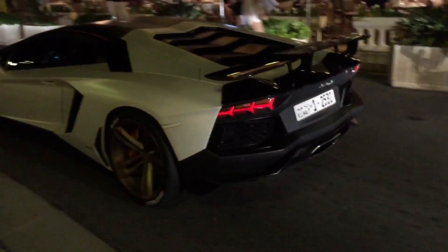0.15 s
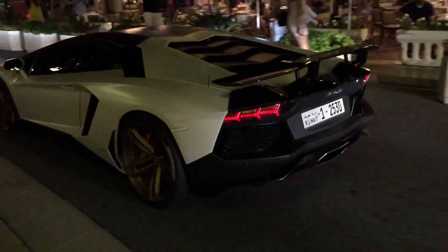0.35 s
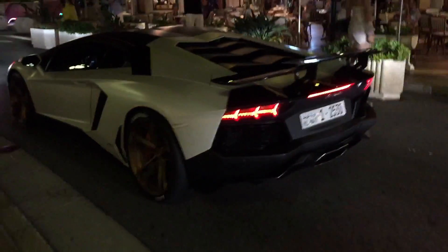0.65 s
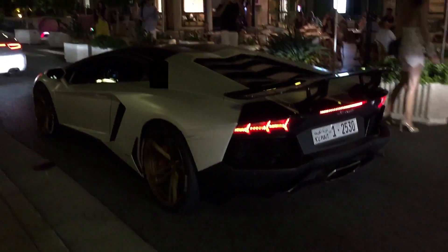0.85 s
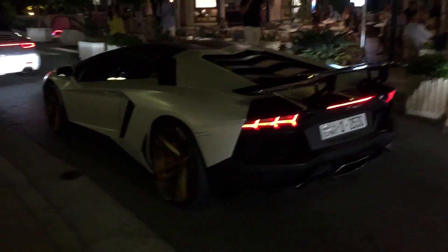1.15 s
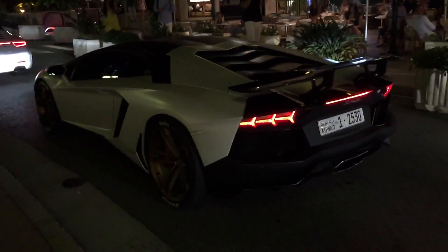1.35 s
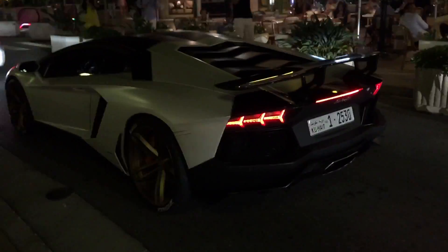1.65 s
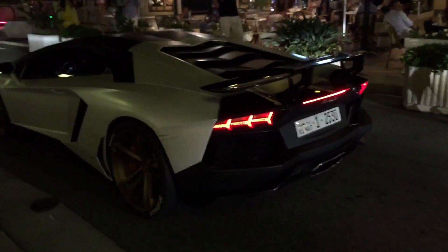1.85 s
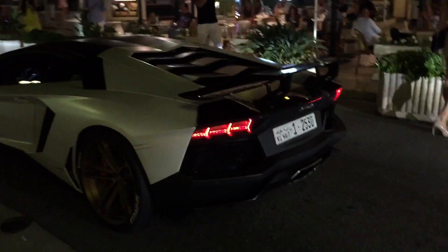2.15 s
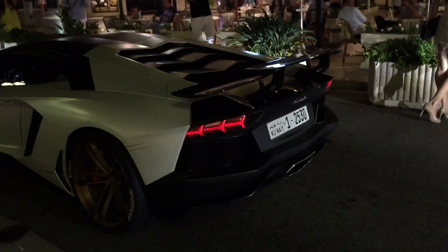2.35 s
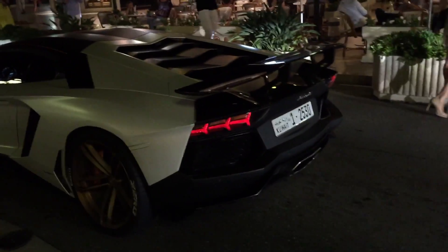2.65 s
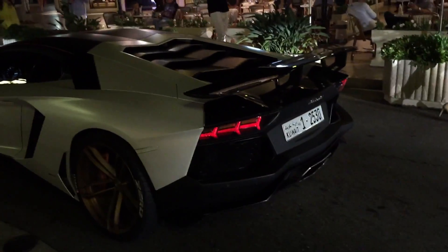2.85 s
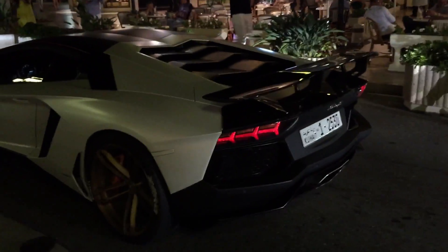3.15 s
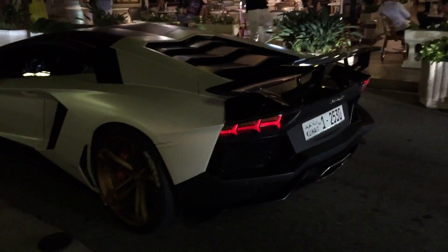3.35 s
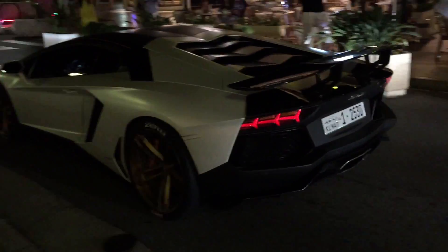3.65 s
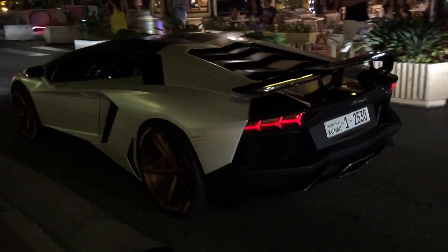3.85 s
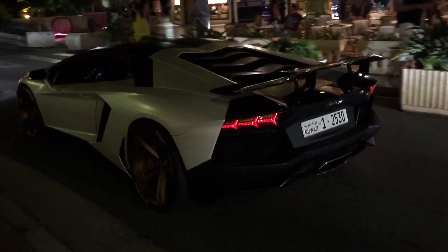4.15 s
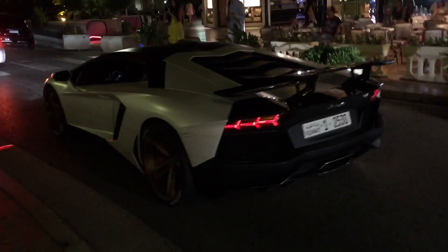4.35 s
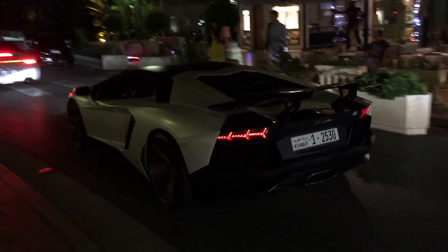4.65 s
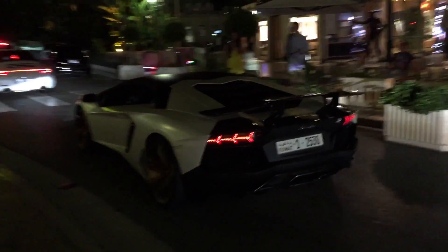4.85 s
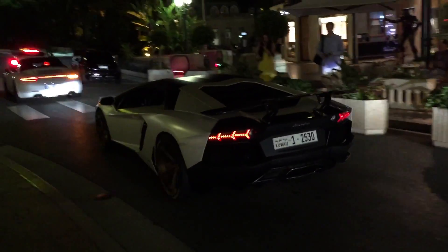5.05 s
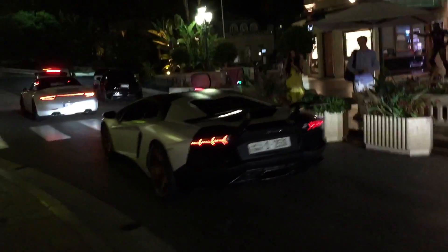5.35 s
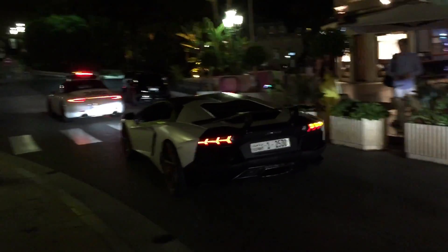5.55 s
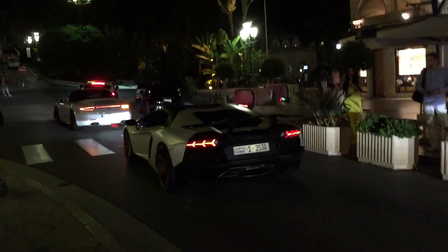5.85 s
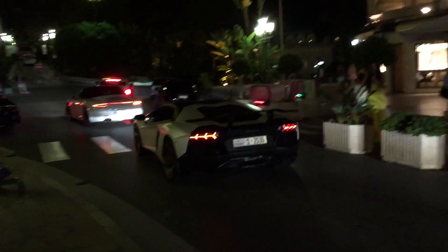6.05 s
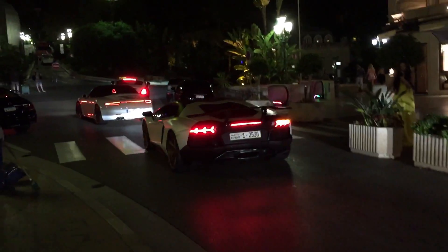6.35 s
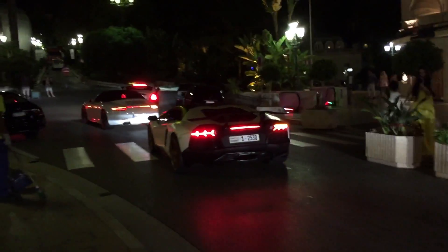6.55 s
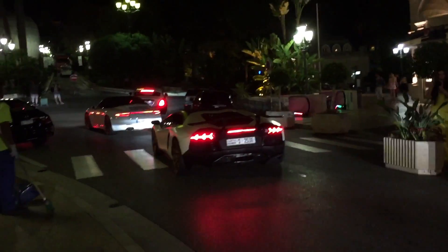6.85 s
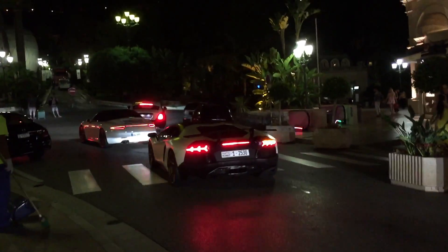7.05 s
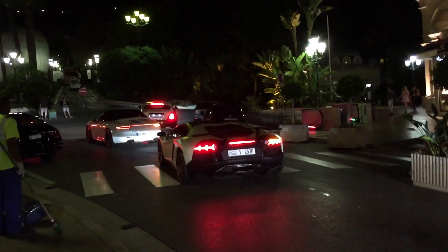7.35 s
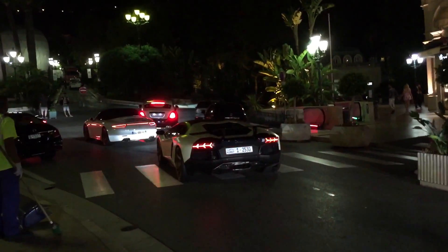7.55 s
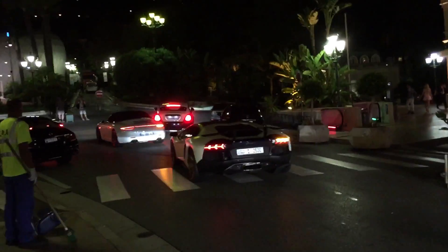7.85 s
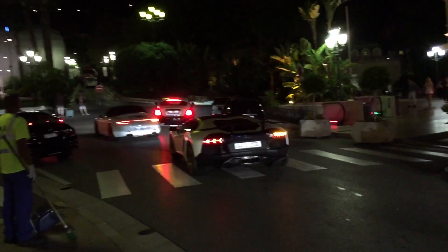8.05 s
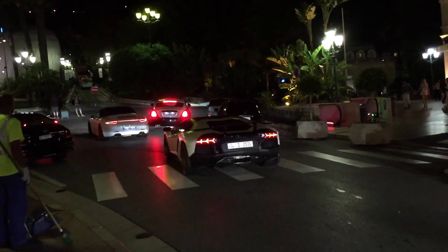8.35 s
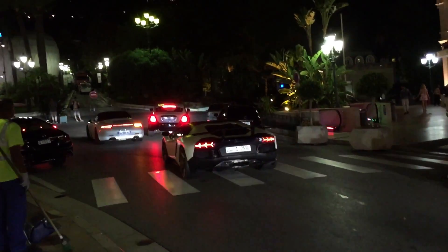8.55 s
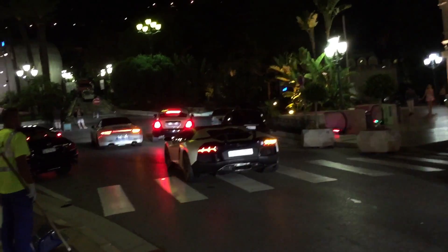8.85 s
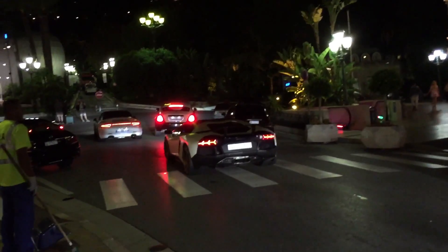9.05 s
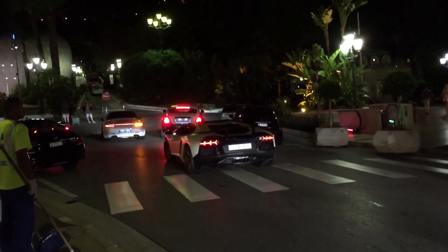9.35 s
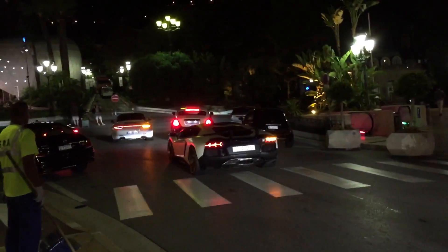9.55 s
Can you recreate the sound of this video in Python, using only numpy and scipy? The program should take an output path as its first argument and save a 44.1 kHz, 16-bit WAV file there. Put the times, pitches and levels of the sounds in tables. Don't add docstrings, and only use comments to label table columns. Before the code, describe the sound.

Lumpy low exhaust drone of a powerful car creeping past, revving up to a smooth hum, crackling off throttle, idling, then surging once more.

```python
import sys
import numpy as np
from scipy import signal
from scipy.fft import rfft, irfft
from scipy.io import wavfile
from scipy.ndimage import uniform_filter1d

SR = 44100
rng = np.random.default_rng(int(sys.argv[2]) if len(sys.argv) > 2 else 0)


def gain_from_decibels(decibels):
    exponent = np.asarray(decibels, float) / 20
    return 10 ** exponent


def generate_wav(signal):
    frames = np.transpose(np.atleast_2d(signal))
    scaled = np.clip(frames, -1, 1) * 32767
    pcm = np.round(scaled).astype(np.int16)
    wavfile.write(sys.argv[1], SR, pcm)


N = 428211


def rms_one(x):
    return x / np.sqrt(np.mean(x ** 2) + 1e-20)


def in_time(rows):
    s, *columns = np.transpose(rows)
    return [np.interp(np.arange(N) / SR, s, c) for c in columns]


def swells(rows):
    t = np.arange(0, N + 64, 64) / SR
    s, half, height = np.transpose(rows)[:, :, None]
    bumps = height * (1 + np.cos(np.pi * np.clip((t - s) / half, -1, 1))) / 2
    return np.interp(np.arange(N) / SR, t, bumps.sum(axis=0))


def drift(rate_hz, count, size):
    knots = rng.standard_normal((count, int(N / SR * rate_hz) + 4))
    at = np.arange(size) / size * N / SR * rate_hz
    return [np.interp(at, np.arange(len(k)), k) * 1.65 for k in knots]


def on_log_pitch(points, hz):
    curve_hz, curve_db = np.array(points).T
    return np.interp(np.log(hz), np.log(curve_hz), curve_db)


def coloured(x, points):
    hz = np.fft.rfftfreq(N, 1 / SR) + 1
    return rms_one(irfft(rfft(x) * gain_from_decibels(on_log_pitch(points, hz)), N))


def resonate(x, modes):
    out = 0
    for k, (hz, width_hz, level_db) in enumerate(modes):
        r = np.exp(-np.pi * width_hz / SR)
        numerator = [(1 - r * r) / 2, 0, (r * r - 1) / 2]
        denominator = [1, -2 * r * np.cos(2 * np.pi * hz / SR), r * r]
        out = out + (-1) ** k * gain_from_decibels(level_db) * signal.lfilter(numerator, denominator, x)
    return out


def gliding_band(envelope, centre_hz, width_hz):
    slow = signal.lfilter(*signal.butter(2, width_hz / SR), rng.standard_normal((2, N)) * envelope)
    turn = 2 * np.pi * np.cumsum(centre_hz) / SR
    return rms_one(slow[0] * np.cos(turn) + slow[1] * np.sin(turn))


# time_s, firings_per_s
SPEED = [(0, 112), (.15, 89), (1.8, 91.5), (2.88, 88.5), (3.03, 100), (3.17, 142), (3.37, 157.6),
         (3.67, 163.2), (4.45, 153), (5.1, 166), (5.42, 146.5), (6.1, 143), (6.5, 126), (6.93, 91),
         (8.53, 93.5), (8.84, 155), (9.36, 184), (9.71, 166)]
# centre_s, half_length_s, lost_firings_per_s
SAGS = [(.28, .2, 15), (.81, .25, 7.5), (1.15, .3, 3.5), (1.98, .12, 2.8), (4.02, .22, 11.5),
        (5.7, .15, -2), (5.9, .15, 9), (6.31, .13, 7), (6.67, .12, 5), (7.06, .2, 10.5), (7.53, .2, 2.6),
        (7.99, .15, 2.6), (8.28, .07, 3), (8.4, .1, 1.6), (9.19, .12, -3), (9.47, .08, 2),
        (9.62, .08, -3.5)]


def engine_speed():
    return in_time(SPEED)[0] - swells(SAGS)


LOADED_SPEED = (91, 180)


def load(speed):
    return np.interp(speed, LOADED_SPEED, [0, 1])


def per_firing(firings):
    return rng.standard_normal(int(firings[-1]) + 1)[firings.astype(int)]


# time_s, level_db
PULSES = [(0, -16), (.6, -13), (1.06, -14.5), (3.05, -14), (3.25, -8), (3.5, -13), (3.85, -13),
          (5.1, -13.5), (5.45, -24), (5.65, -22), (6.0, -21), (6.8, -12.5), (6.96, -11), (8.55, -14.5),
          (8.87, -7.5), (9.1, -12), (9.62, -15.5), (9.71, -24.5)]
# pitch_hz, gain_db
PIPE_GAIN = [(74, -13.5), (82, -12.5), (90, -10), (110, -3.5), (128, -1.5), (145, 1.5), (160, 1.5),
             (184, 2.5)]
# pitch_hz, gain_db
OCTAVE_GAIN = [(148, -2), (182, -1), (205, -7.5), (240, -19.5), (282, -7.5), (312, -32), (345, -21),
               (370, -37.5)]
# centre_s, half_length_s, tone_loss_db, octave_loss_db
STUMBLES = [(.14, 0.11, -2, -2.5), (0.423, 0.07, 2, 3), (0.708, 0.072, 4.5, 2.5), (.98, 0.09, 0.5, 2),
            (1.94, 0.053, 3, 1.5), (2.764, 0.044, 5, 4.5), (2.864, .05, -1, 0.5), (3.083, 0.04, 0, 19),
            (4.013, .2, 6.5, 7), (4.46, 0.19, 1.5, 4), (5.49, .25, 4.5, 4), (5.897, .06, 1, -5.5),
            (6.192, 0.047, 5, 3), (6.854, .06, 3, 7), (7.14, 0.16, 8, 3), (7.328, 0.056, 4, 3),
            (7.6, 0.079, -.5, 5), (7.768, 0.03, 10, 3.5), (7.92, 0.06, 0.5, 4.5), (8.057, 0.027, 0, 8),
            (8.1, 0.035, 6, -.5), (8.15, .04, -1.5, 2), (8.234, 0.021, 1.5, 3), (8.34, 0.036, 0.5, 3),
            (8.463, 0.039, 4, 2), (8.647, 0.12, 2, 19), (8.773, 0.066, 8, 5.5), (8.973, .07, 3, -2),
            (9.198, .06, 2, 12), (9.432, 0.087, 3.5, 6)]


def note_levels(speed):
    gaps = [(s - 0.008, 0.034, 4) for s, _ in POPS]
    pulse_db = in_time(PULSES)[0] - swells(gaps)
    tone_db = pulse_db + on_log_pitch(PIPE_GAIN, speed) - swells(np.array(STUMBLES)[:, :3])
    octave_db = pulse_db + on_log_pitch(OCTAVE_GAIN, 2 * speed) - swells(np.delete(STUMBLES, 2, axis=1))
    harsh_db = in_time(IMBALANCE)[2]
    return tone_db, octave_db + 0.79 * load(speed) * (harsh_db - harsh_db.mean())


def firing_tones(firings, tone_db, octave_db):
    turn = 2 * np.pi * firings
    return np.sqrt(2) * (gain_from_decibels(tone_db) * np.sin(turn) + gain_from_decibels(octave_db) * np.sin(2 * turn + 0.63))


# time_s, lumpiness_db, bank_lopsidedness_db, harshness_db
IMBALANCE = [(0, -25.5, -40, -29), (.45, -30.5, -31.5, -44), (.98, -26.5, -25.5, -44),
             (1.6, -24, -31.5, -47), (2.9, -28.5, -31, -47.5), (3.14, -23.5, -19.5, -37),
             (3.5, -33, -28, -38), (4.45, -32.5, -29, -42), (5.2, -34.5, -43, -36), (5.9, -27, -35, -36),
             (6.81, -25.5, -35, -36.5), (7.15, -32, -31.5, -43), (8.5, -26.5, -38, -25.5),
             (8.66, -22.5, -23, -20), (8.77, -28.5, -22, -29.5), (9.05, -28, -24, -28.5),
             (9.22, -39, -44, -34), (9.71, -36.5, -36.5, -45.5)]


def imbalance_levels(speed):
    lumpy_db, lopsided_db, harsh_db = in_time(IMBALANCE)
    lost_db = load(speed) * swells(np.array(STUMBLES)[:, :3])
    scatter_db = -34 + 0.95 * (lumpy_db - lumpy_db.mean())
    return lumpy_db, lopsided_db - 2 * lost_db, harsh_db, scatter_db


# order_quarters, level_db
QUARTERS = [(2, -0.5), (3, 3.5), (5, -1), (6, 0), (7, 2.5), (9, -5.5), (10, -5.5), (11, -6), (12, 0.5),
            (13, -13), (14, -16), (15, -14), (16, -8.5), (18, -25), (20, -16.5), (24, -6.5)]
# pitch_hz, width_hz, level_db
PIPE = [
    [(58.3, 29, -13.5), (114, 60.6, -3.5), (184.2, 28.9, 4)],
    [(278.9, 34.5, 0)],
    [(356.3, 45.6, -2), (453, 24, -12.5), (587.5, 77, 0)],
]


def imbalance(firings, low_db, middle_db, upper_db, scatter_db):
    coarse = firings[::8]
    wander = drift(5.5, count=len(QUARTERS), size=len(coarse))
    start = rng.random(len(QUARTERS))
    lines = 0
    for (quarters, level_db), w, phase in zip(QUARTERS, wander, start):
        lines = lines + gain_from_decibels(level_db + 1.18 * w) * np.sin(2 * np.pi * (coarse * round(quarters) / 4 + phase))
    lines = signal.resample_poly(lines, 8, 1)[:N]
    kicks = np.diff(firings.astype(int), prepend=0) * per_firing(firings)
    misfires = rms_one(resonate(resonate(kicks, sum(PIPE, [])), [(156, 88, 0)]))
    low = resonate(lines, PIPE[0])
    middle, upper = (resonate(resonate(lines, modes), modes) for modes in PIPE[1:])
    tones = gain_from_decibels(low_db) * low - gain_from_decibels(middle_db + 1.5) * middle + gain_from_decibels(upper_db - 2.5) * upper
    return tones + gain_from_decibels(scatter_db) * misfires


SPIT_DB = [4.5, -2, 3.5, 1.5]


def bursts(firings, scatter_db, fade):
    chance = np.clip(per_firing(firings), -2, 1.6)
    strength = gain_from_decibels(np.array(SPIT_DB)[firings.astype(int) % 4] + scatter_db * chance)
    return uniform_filter1d(strength * np.exp(-fade * (firings % 1)), size=40)


# time_s, level_db
FLOW = [(0, -49), (.27, -52), (.68, -48), (1.76, -47), (2.9, -48.5), (3.22, -41.5), (3.42, -51),
        (3.97, -53.5), (4.98, -51), (5.32, -57.5), (5.84, -50.5), (6.89, -47), (7.2, -48), (8.4, -49.5),
        (8.79, -38.5), (8.98, -48), (9.6, -56.5), (9.71, -58)]
MEAN_FLOW_DB = -50
# centre_s, half_length_s, rasp_db, low_modes_db, middle_modes_db
STABS = [(.06, 0.27, 5, 4, 0), (.8, .3, -2.5, -2, -3), (1.15, 0.22, 2.5, -4, -1.3), (2.1, .3, -3, 1.5, 1),
         (3.207, 0.18, 7, 3, 4), (3.324, 0.099, 3.5, 9, 3.5), (3.498, 0.25, 1.5, -2, 4),
         (3.95, 0.54, 3, 2.5, 3), (4.6, 0.63, 1.5, -6, 0), (5.4, 0.92, -1, 0, -6), (6.14, 0.2, -2, 8, -2.5),
         (6.773, 0.1, 3, 9, -2), (6.915, 0.046, 9, -4, 1.5), (5.848, 0.23, 3, 3, -2),
         (7.5, 0.6, 3, 4.5, 2.5), (8.4, 0.46, 5.5, -1, 4.5), (8.706, .12, -1, 3.5, 1.5),
         (8.94, 0.22, 2, 6, 2.5), (9.55, 0.28, -5, 3.5, 0.5)]


def rasp_levels(speed):
    flow_db = in_time(FLOW)[0]
    crackle_db = swells([(s - 0.035, 0.019, 5) for s, _ in POPS])
    rasp_db = -47.5 + (flow_db - MEAN_FLOW_DB) + 3.5 * np.log2(speed / 113.0)
    return rasp_db + crackle_db + swells(np.array(STABS)[:, :3]), flow_db + 0.22 * crackle_db


# time_s, lower_hz, upper_hz, upper_re_lower_db
RASP_BANDS = [(0, 2482, 4420, -23), (0.4, 2500, 4390, -21), (0.55, 2675, 4404, -7), (3.0, 2500, 4305, -14),
              (3.1, 2250, 4200, -17), (3.35, 2484, 3900, -20.5), (5.05, 2796, 4400, -8),
              (5.15, 2172, 3700, -9.5), (6.3, 2350, 4000, -13.5), (7.0, 2443, 4450, -8),
              (7.2, 2952, 6060, -16), (8.2, 3050, 6150, -8.5), (8.7, 3110, 6270, -13),
              (9.71, 3280, 6560, -13.5)]
# pitch_hz, density_db
HISS_COLOUR = [(700, -39), (1300, -16.5), (1950, -6.5), (3000, -10), (3450, -11), (5000, -15.5),
               (6500, -16.5), (7600, -20), (8500, -18.5), (10000, -22.5), (10400, -28.5), (11000, -26),
               (15300, -33.5)]


def rasp(firings, rasp_db, hiss_db):
    lower_hz, upper_hz, upper_db = in_time(RASP_BANDS)
    puffs = bursts(firings, scatter_db=2.5, fade=3.8)
    lower_hz = lower_hz * (1 + 0.05 * (np.arange(N) / N) ** 2 * per_firing(firings))
    tick = gain_from_decibels(8 * (firings.astype(int) % 4 == 0))
    lower = gliding_band(0.22 + puffs, lower_hz, width_hz=380)
    upper = gliding_band(0.12 + tick * bursts(firings, scatter_db=5.0, fade=1.6), upper_hz, width_hz=850)
    steady_hz = np.full(N, 2350.)
    steady = gliding_band(0.12 + bursts(firings, scatter_db=4.5, fade=0.99), steady_hz, width_hz=370)
    hiss = coloured(rng.standard_normal(N) * (3.5 + bursts(firings, scatter_db=8.0, fade=2.5)), HISS_COLOUR)
    bands = lower + gain_from_decibels(upper_db) * upper + gain_from_decibels(-4.5) * steady
    return gain_from_decibels(rasp_db - 1.0) * bands + gain_from_decibels(hiss_db + 4.5) * hiss


# level_db at mean flow, flow_swing_share, fade_db_per_s
BREATH = [
    (-45.5, 0.95, -0.1),
    (-40.5, 0.95, 0.3),
    (-38.5, 0.48, 1.35),
]


def breath_levels():
    swing_db, aim_db = in_time(FLOW)[0] - MEAN_FLOW_DB, in_time(RASP_BANDS)[2]
    low, middle, upper = (db + share * swing_db - fade * np.arange(N) / SR for db, share, fade in BREATH)
    low_stab_db, middle_stab_db = (swells(np.array(STABS)[:, [0, 1, k]]) for k in (3, 4))
    return low + low_stab_db, middle + middle_stab_db, upper + 0.55 * (aim_db - aim_db.max())


# pitch_hz, width_hz, level_db
THROAT = [
    [(547.3, 58, 4.5), (588, 35, -0.5)],
    [(757, 332, -4.5), (1060, 96, 2.5), (1211, 320, -5)],
    [(1320, 250, 2.5), (1697, 210, 4.5)],
]


def breath(firings):
    out = 0
    for modes, level_db in zip(THROAT, breath_levels()):
        flow = rng.standard_normal(N) * (0.81 + bursts(firings, scatter_db=5.0, fade=0.95))
        out = out + gain_from_decibels(level_db - 3.0) * rms_one(resonate(resonate(flow, modes), modes))
    return out


# time_s, level_db
RUMBLE = [(0, -38), (.5, -36.5), (1.0, -42), (1.8, -34), (2.0, -37), (3.1, -34), (3.43, -45.5), (5.8, -48),
          (6.15, -30.5), (6.9, -26.5), (7.6, -34.5), (7.8, -31.5), (8.1, -37.5), (8.7, -28), (9.33, -46.5),
          (9.71, -46.5)]
# pitch_hz, density_db
RUMBLE_COLOUR = [(15, -38.5), (30, -19), (45, -6), (65, -7), (100, -3.5), (250, -27), (450, -28.5),
                 (1000, -57.5)]


def low_rumble():
    return gain_from_decibels(in_time(RUMBLE)[0]) * coloured(rng.standard_normal(N), RUMBLE_COLOUR)


# start_s, length_s, pitch_hz, level_db
SQUEALS = [
    (0.57, 0.21, 6340, -55),
    (1.189, 0.15, 6430, -57),
    (1.68, .17, 6440, -57),
    (2.3, 0.22, 6350, -67),
]


def brakes():
    t, out, white = np.arange(N) / SR, np.zeros(N), rng.standard_normal(N)
    for start, length, hz, level_db in SQUEALS:
        swell = np.clip(np.minimum(t - start, start + length - t) / 0.027, 0, 1)
        mode = [(hz, 120, 0)]
        out += gain_from_decibels(level_db) * swell * rms_one(resonate(resonate(white, mode), mode))
    return out


# time_s, peak_db
POPS = [(5.903, -34), (5.956, -25), (6.073, -16), (6.173, -7.5), (6.252, -17), (6.302, -7.5), (6.421, -7.5),
        (6.496, -13), (6.584, -14), (6.644, -19), (6.716, -14), (6.788, -14), (6.881, -8)]


def pops():
    kicks = np.zeros(N) + 1e-18
    for s, level_db in POPS:
        kicks[round(s * SR)] = gain_from_decibels(level_db + 51) * rng.choice([-1, 1])
    return resonate(resonate(kicks, [(172.3, 19.3, 3.5), (286, 24, -10)]), [(184, 54, 0)])


def scene():
    speed = engine_speed()
    firings = np.cumsum(speed) / SR
    car = firing_tones(firings, *note_levels(speed)) + imbalance(firings, *imbalance_levels(speed))
    car += rasp(firings, *rasp_levels(speed)) + breath(firings) + pops()
    return (car + low_rumble() + brakes())[None]


def band_limit(x):
    return signal.sosfilt(signal.butter(12, 15370, fs=SR, output="sos"), x)


def record(dry):
    mix = 1.486 * np.tanh(dry / 1.333)
    return band_limit(mix)


dry = scene()
out = record(dry)
generate_wav(out)
```